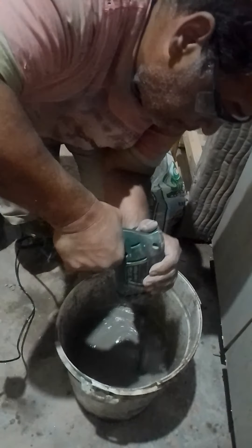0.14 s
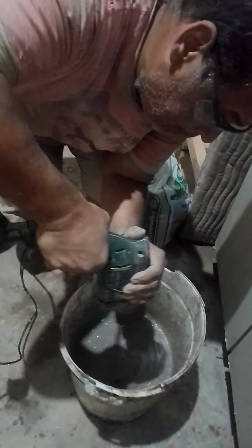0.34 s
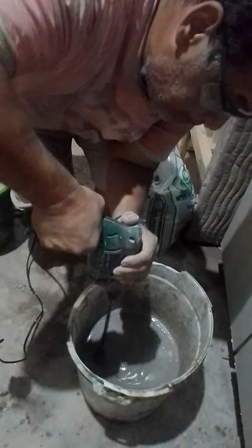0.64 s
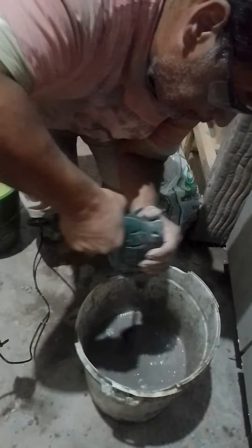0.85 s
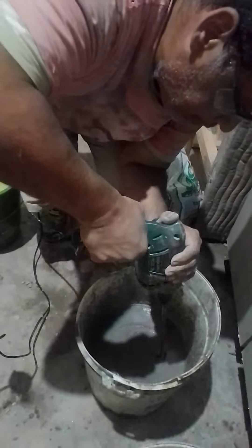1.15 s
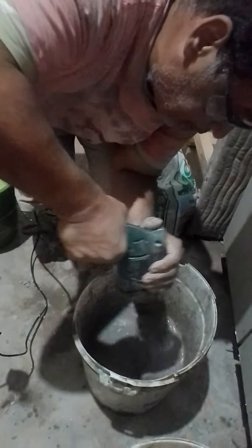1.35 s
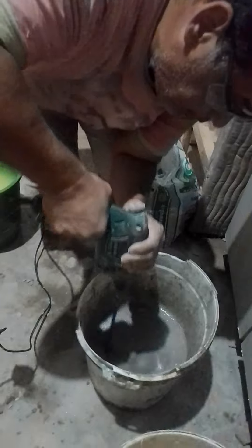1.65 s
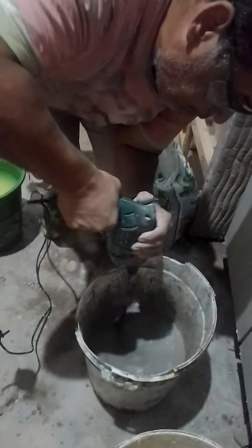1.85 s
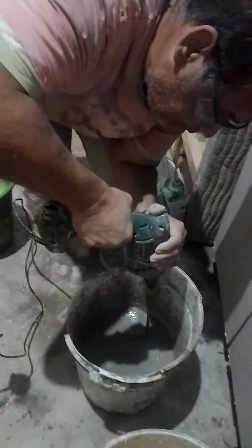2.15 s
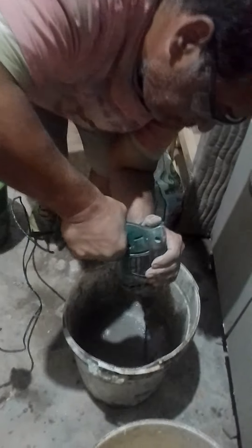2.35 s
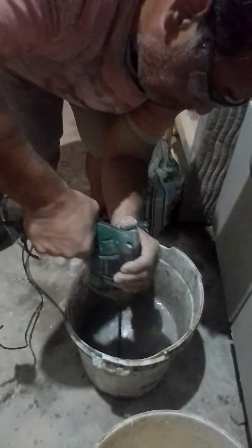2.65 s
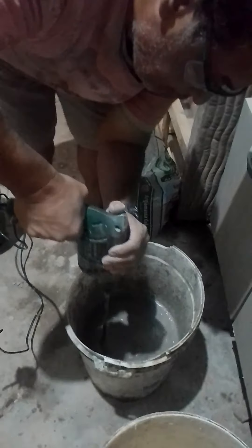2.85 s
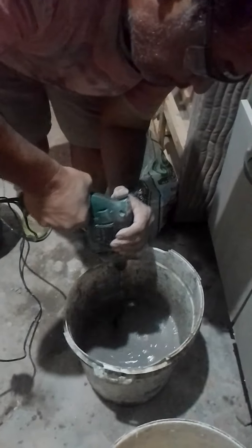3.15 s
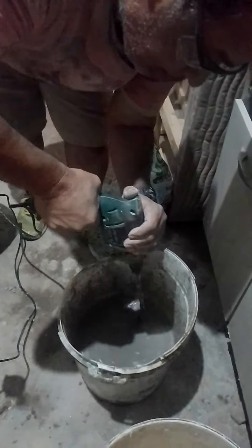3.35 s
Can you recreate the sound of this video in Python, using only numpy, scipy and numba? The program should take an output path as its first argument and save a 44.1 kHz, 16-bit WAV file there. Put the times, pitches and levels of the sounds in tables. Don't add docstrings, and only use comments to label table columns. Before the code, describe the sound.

Steady high drill whine under load, wavering slightly, over a low churning drag of mortar; hollow bucket knocks, short metallic scrapes and ticking grit come and go, close up on a hard-floored work site.

```python
import sys
import numpy as np
from scipy import signal
from scipy.fft import rfft, irfft
from scipy.io import wavfile
from scipy.ndimage import uniform_filter1d
from numba import njit

SR = 44100
rng = np.random.default_rng(int(sys.argv[2]) if len(sys.argv) > 2 else 0)


def gain_from_decibels(decibels):
    exponent = np.asarray(decibels, float) / 20
    return 10 ** exponent


def persist_wave(psi):
    counts = np.round(np.clip(psi, -1, 1) * 32767).astype(np.int16)
    wavfile.write(sys.argv[1], SR, np.atleast_2d(counts).T)


N = 154350

# hit in seconds, peak level in dB.
STONES = [(0.2433, -16), (0.9218, -16), (1.1538, -8), (1.1942, -9), (1.3515, -18), (1.5125, -18),
          (1.6167, -10), (1.736, -20), (1.8936, -18), (2.2358, -17), (2.3271, -19), (2.487, -17),
          (2.6968, -17), (3.1487, -21), (3.2316, -16), (3.3982, -20)]
# start in seconds, length in seconds, level in dB.
SCRAPES = [(1.043, .12, -42), (1.565, .12, -38), (1.984, 0.076, -26), (2.108, .05, -23.5), (2.2, 0.15, -28),
           (2.39, 0.052, -30), (2.505, 0.044, -28), (2.69, 0.208, -30), (2.948, .1, -29.5),
           (3.247, .06, -31.5), (3.374, 0.035, -33)]
# frequency in Hz, width in Hz, level in dB.
PADDLE_MODES = [(562, 24, 0.5), (664.6, 20, -11), (812, 22, 5.7), (920, 930, -9.5), (5240, 2200, -15),
                (995, 36, -10.5), (1095, 69, -13.5), (1223, 11.3, 2)]
# frequency in Hz, width in Hz, level in dB.
BUCKET_MODES = [(121, 17, -27.5), (198, 20, -25.5), (267.5, 42, -11.5), (297, 28, -0.3), (338, 40, -14),
                (380.6, 47, -12.5), (434.3, 16.5, -13)]
# time in seconds, level in dB.
DRAG = [(0, -29), (.35, -27.5), (.55, -23), (.9, -27), (1.35, -24.5), (1.95, -26.5), (2.1, -28.5),
        (2.35, -27), (2.8, -27), (3.3, -30.5), (3.5, -24)]
# peak in seconds, peak level in dB, pitch in Hz, length in seconds.
THUMPS = [(0.077, -12.5, 308, 0.023), (0.301, -14.5, 301, 0.032), (0.478, -8.5, 298, 0.02),
          (0.504, -10, 308, 0.01), (0.556, -9.5, 298, 0.069), (0.596, -9.5, 300, 0.0097),
          (0.751, -11, 334, 0.013), (0.778, -14, 312, 0.022), (0.856, -12, 297, 0.013),
          (1.121, -11.5, 300, 0.011), (1.147, -19, 306, 0.021), (1.206, -12.5, 297, 0.013),
          (1.236, -3.5, 303, 0.013), (1.404, -12, 329, 0.014), (1.567, -13.5, 286, 0.023),
          (1.627, -15, 338, 0.014), (1.804, -3, 294, 0.011), (1.855, -6.5, 297, 0.014),
          (1.889, -15, 286, 0.022), (1.949, -10.5, 297, 0.033), (2.249, -13, 305, 0.017),
          (2.286, -11, 304, 0.03), (2.341, -11, 293, 0.012), (2.413, -9, 340, 0.011),
          (2.905, -12, 285, 0.013), (2.997, -9, 302, 0.0088), (3.275, -9.5, 300, 0.022),
          (3.337, -9.5, 288.4, 0.016)]
# frequency in Hz, density in dB per Hz.
RUSH_COLOUR = [(150, -23), (450, -4), (1100, -1.5), (2700, -4), (4400, -9), (8000, 3.5), (11000, -8),
               (15500, -16.5)]
# frequency in Hz, width in Hz, level in dB.
HOUSING_MODES = [(796, 67, -12), (1230, 830, -27), (1688, 414, -5), (2049, 362, -0.5), (3517, 700, -3.5),
                 (5310, 1090, -6), (6670, 400, -6), (8800, 900, -4.5), (10280, 360, -17)]
# time in seconds, tooth meshing rate in Hz,
# then whine, second harmonic and third harmonic in dB.
MOTOR = [(0, 1801, -22, -21, -27), (.2, 1801, -23, -19, -30), (.4, 1819, -19.5, -23, -31),
         (.56, 1805, -23, -25, -26), (.64, 1780, -22, -25, -27.5), (.75, 1773, -21.5, -25, -29),
         (.82, 1795, -21.5, -27, -31), (.98, 1790, -22.5, -21, -34), (1.26, 1778, -24, -26, -35),
         (1.48, 1806, -23, -24, -30), (1.56, 1788, -24, -27, -30), (1.76, 1769, -23.5, -34, -27),
         (1.96, 1773, -30, -24, -27.5), (2.34, 1724, -28, -25, -33), (2.6, 1748, -19, -30, -29),
         (2.8, 1772, -23.5, -24, -30), (2.95, 1727, -29, -24, -28), (3.5, 1748, -30, -26, -31)]
ROTOR_ORDERS = [8, 12, 13, 15, 24, 28, 33, 35, 39]
ROTOR_DB = [-33, -44, -54, -53, -51, -33.5, -34, -33, -37]

TEETH = 7
GEAR_RATIO = 10
SPEED_WOBBLE = .0013
SURGE_DB = 1.62
SPINDLE_DEPTH = .3
TONE_FLICKER_DB, TONE_FLICKER_HZ = 2.0, 24
TOOTH_SLIP_RAD, TOOTH_SLIP_HZ = .075, 45
WHINE_DB = -0.45
CLATTER_DB, CLATTER_SCATTER_DB = -20, 7.5
RUSH_DB, RUSH_FLICKER_DB = -19.5, 0.87
BLADE_SLAP_HZ, BLADE_SLAP_DEPTH = 33.5, .3
DRAG_SURGE_DB, DRAG_EVENNESS = .8, .4
THUMP_STRETCH, THUMP_DB = 0.65, -4.5
SCRAPE_EDGE_S, SCRAPE_REST_DB = 0.063, -39.5
GRIT_PER_S, GRIT_HZ, GRIT_S = 200, 11000, 0.0019
GRIT_DB, GRIT_SCATTER_DB, STONE_DB = -25.5, 2.2, -4
RUMBLE_HZ, RUMBLE_DB = 60, -56
MIC_LOW_HZ = 118
AGC_TOP_DB, AGC_RATIO, AGC_ATTACK_S, AGC_RELEASE_S = -15.5, 2.84, 0.0057, 0.031
OUT_DB, LIMIT = 2.5, .66


def level(x, db):
    return x * gain_from_decibels(db) / np.sqrt(np.mean(x ** 2))


def noise():
    return rng.standard_normal(N)


def walk(rate_hz):
    f = np.fft.rfftfreq(N, 1 / SR)
    slow = (f > 0) / (1 + (f / rate_hz) ** 2)
    return level(irfft(rfft(noise()) * slow, N), 0)


def ring(x, modes):
    f = np.fft.rfftfreq(N, 1 / SR) + 1e-3
    response = 0
    for k, (hz, width, db) in enumerate(modes):
        detune = (f / hz - hz / f) * hz / (1.17 * width)
        response = response + (-1) ** k * gain_from_decibels(db) / (1 + 1j * detune) ** 2
    return irfft(rfft(x) * response, N)


def rumble():
    shake = noise() * gain_from_decibels(9.9 * walk(5.4))
    return level(ring(shake, [(RUMBLE_HZ, 90, 0)]), RUMBLE_DB)


def grit():
    strength = gain_from_decibels(GRIT_DB + GRIT_SCATTER_DB * noise())
    ticks = (rng.random(N) < GRIT_PER_S / SR) * strength
    for s, db in STONES:
        ticks[int(s * SR)] = gain_from_decibels(db + STONE_DB)
    tail = np.exp(-np.arange(400) / SR / GRIT_S)
    bursts = signal.fftconvolve(ticks, tail)[:N] * noise()
    return ring(bursts, [(GRIT_HZ, 8000, 0)])


def paddle(t):
    touch = gain_from_decibels(SCRAPE_REST_DB)
    for s, length, db in SCRAPES:
        inside = np.minimum(t - s, s + length - t)
        touch = touch + gain_from_decibels(db) * np.clip(inside / SCRAPE_EDGE_S + .5, 0, 1)
    force = noise() * gain_from_decibels(4.5 * walk(34))
    return ring(force * touch, PADDLE_MODES) / np.std(ring(force, PADDLE_MODES))


def bucket(t):
    slap_hz = BLADE_SLAP_HZ * (1 + 0.082 * walk(3.1))
    slap = 1 + BLADE_SLAP_DEPTH * np.sin(2 * np.pi * np.cumsum(slap_hz) / SR)
    wall = ring(noise() * gain_from_decibels(DRAG_SURGE_DB * walk(8.2)), BUCKET_MODES)
    wall = wall / uniform_filter1d(abs(wall), size=900) ** DRAG_EVENNESS
    out = slap * level(wall, 0) * gain_from_decibels(np.interp(t, *np.array(DRAG).T))
    for s, db, hz, length in THUMPS:
        near = slice(max(int((s - .1) * SR), 0), int((s + .1) * SR))
        u = t[near] - s
        swell = np.exp(-(u / (THUMP_STRETCH * length)) ** 2)
        thump = gain_from_decibels(db + THUMP_DB) * swell * np.sin(2 * np.pi * hz * u)
        out[near] = out[near] * (1 - 0.36 * swell) + thump
    return out


def rush(surge_db):
    f = np.fft.rfftfreq(N, 1 / SR) + 1
    hz, db = np.array(RUSH_COLOUR).T
    air = rfft(noise()) * gain_from_decibels(np.interp(np.log(f), np.log(hz), db, left=-30))
    out = 0
    for octave in range(-1, 9):
        share = np.clip(1 - abs(np.log2(f / 62.5) - octave), 0, 1)
        out = out + irfft(air * share, N) * gain_from_decibels(surge_db + RUSH_FLICKER_DB * walk(36))
    return level(out, RUSH_DB)


def clatter(turns, surge_db):
    hits = np.diff(np.floor(TEETH * turns), prepend=0) > 0
    knocks = hits * noise() * gain_from_decibels(CLATTER_SCATTER_DB * np.tanh(walk(48)))
    shake = knocks + 0.37 * noise()
    return level(ring(shake * gain_from_decibels(surge_db), HOUSING_MODES), CLATTER_DB)


def whine(t, turns):
    rows = np.array(MOTOR).T
    tones = list(zip(ROTOR_ORDERS, ROTOR_DB))
    for k in range(1, 4):
        tones.append((k * TEETH, np.interp(t, rows[0], rows[k + 1]) + WHINE_DB))
    out = 0
    for order, db in tones:
        beat_start, tone_start = 2 * np.pi * rng.random(2)
        beat = 1 + SPINDLE_DEPTH * np.sin(2 * np.pi * turns / GEAR_RATIO + beat_start)
        slip = TOOTH_SLIP_RAD * np.sqrt(order) * walk(TOOTH_SLIP_HZ)
        tone = np.sin(2 * np.pi * order * turns + tone_start + slip)
        loudness = np.sqrt(2) * gain_from_decibels(db + TONE_FLICKER_DB * walk(TONE_FLICKER_HZ))
        out = out + loudness * beat * tone
    return out


def scene():
    t = np.arange(N) / SR
    rows = np.array(MOTOR).T
    mesh_hz = np.interp(t, rows[0], rows[1]) * (1 + SPEED_WOBBLE * walk(20))
    turns = np.cumsum(mesh_hz / TEETH) / SR
    surge_db = SURGE_DB * (walk(14) + 0.19 * np.sin(2 * np.pi * turns / GEAR_RATIO))
    stirring = rumble() + grit() + paddle(t) + bucket(t)
    drill = rush(surge_db) + clatter(turns, surge_db) + whine(t, turns) * gain_from_decibels(surge_db)
    mono = stirring + drill
    return np.array([mono, mono])


@njit
def follow(x, up, down):
    e, y = .2, np.empty(len(x))
    for i in range(len(x)):
        e += (x[i] - e) * (up if x[i] > e else down)
        y[i] = e
    return y


def low_pass(x):
    return signal.sosfilt(signal.butter(12, 15680, fs=SR, output="sos"), x)


def record(dry):
    x = signal.sosfilt(signal.butter(2, MIC_LOW_HZ, "high", fs=SR, output="sos"), dry)
    heard = follow(abs(x[0]), 1 / (AGC_ATTACK_S * SR), 1 / (AGC_RELEASE_S * SR))
    duck = np.minimum(1, gain_from_decibels(AGC_TOP_DB) / heard) ** (1 - 1 / AGC_RATIO)
    x = x * gain_from_decibels(OUT_DB) * duck
    x = x / (1 + (abs(x) / LIMIT) ** 6) ** (1 / 6)
    return low_pass(x)


dry = scene()
out = record(dry)
persist_wave(out)
```